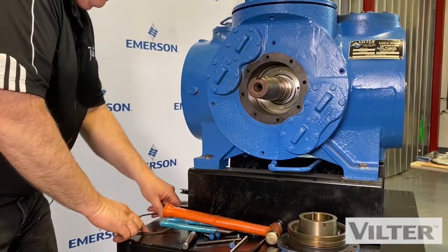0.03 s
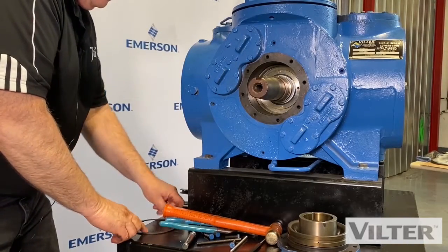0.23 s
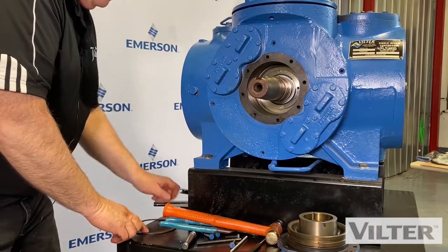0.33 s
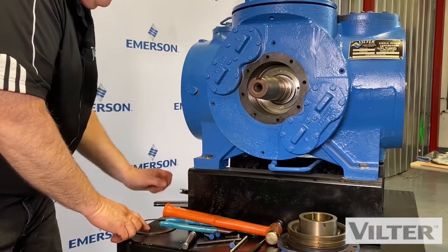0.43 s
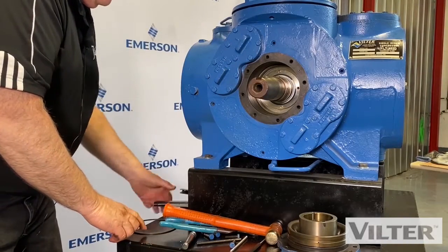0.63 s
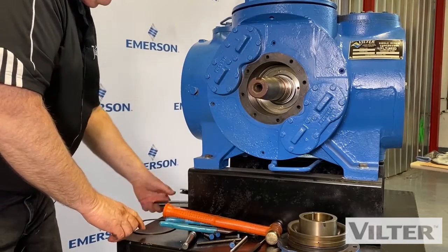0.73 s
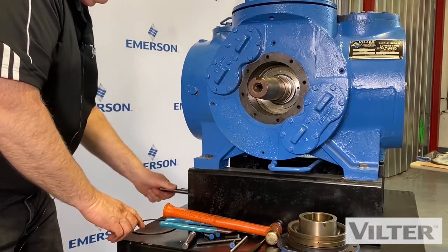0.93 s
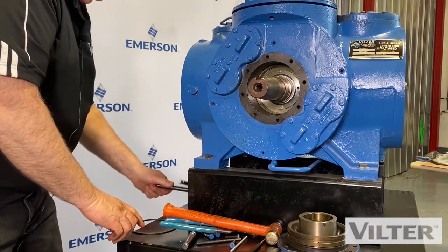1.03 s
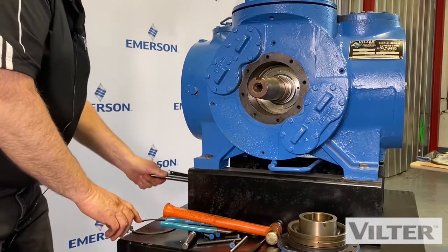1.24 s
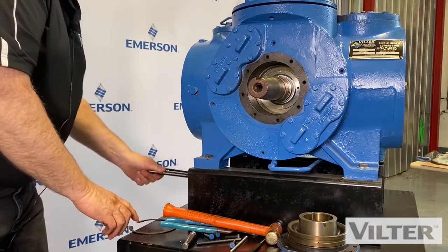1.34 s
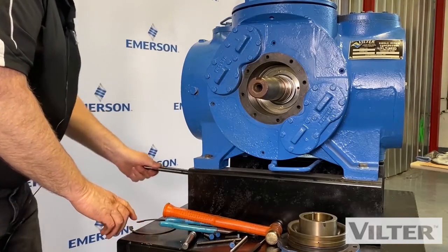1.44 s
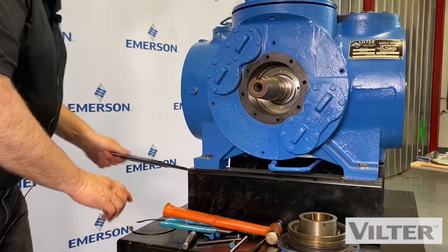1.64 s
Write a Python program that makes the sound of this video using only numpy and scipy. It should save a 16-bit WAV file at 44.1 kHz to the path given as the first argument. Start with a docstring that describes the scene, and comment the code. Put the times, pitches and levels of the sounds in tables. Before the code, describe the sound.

A steel tool clanks onto a metal table, then a rod rattles and slides away.

```python
"""A large workshop, at a metal table. A steel tool drops among others: one bright clank and a bounce.
A steel rod then slides out, clinks on a neighbour, knocks and rattles on the table and is drawn away.
The hits layer dying sines for the ring of the metal with fast-fading noise for its crash; the slides
are grainy noise. The hall rings after each blow, over a low bed of ventilation rumble."""
import sys
import numpy as np
from scipy import signal
from scipy.fft import rfft, irfft
from scipy.io import wavfile
from scipy.ndimage import uniform_filter1d

SR = 44100
rng = np.random.default_rng(int(sys.argv[2]) if len(sys.argv) > 2 else 0)


def to_wav(sig):
    """Store sig (one row per channel, or 1-D mono) as 16-bit WAV at the path in sys.argv[1].

    Samples outside -1..1 are clipped; the rate is SR.
    """
    pcm = np.clip(np.atleast_2d(sig), -1, 1) * 32767
    pcm = np.round(pcm).astype(np.int16)
    wavfile.write(sys.argv[1], SR, pcm.T)  # frames by channels


N = 74970
T = np.arange(N) / SR
HZ = np.fft.rfftfreq(N, 1 / SR)

# The tool lands and bounces. Each row: start in seconds, level in dB, tilt in dB per octave.
LANDINGS = [(0.2192, -21.5, 1.5), (.2212, -13, -0.5), (0.2423, -20.5, 0), (.2446, -26.5, -.5),
            (0.2518, -23.5, 0)]
# The tool's ring. Each row: pitch in Hz, relative level in dB, time to fade by 60 dB (t60) in seconds.
TOOL_MODES = [(363, -20, .4), (548, -20, .12), (636, -12, .11), (702, -15, .09), (797, -21, .5),
              (1312, -15, .12), (1525, -21, .17), (1620, -22, .33), (1748, -12, .12), (1815, -15, .09),
              (1895, -28, .55), (2150, -19, .07), (2405, -21, .09), (3270, -15, .035), (3407, -16, .045),
              (4790, -18, .06), (6545, -10, .05), (8040, -14, .045)]
# The clatter of the pile under it. Each row: frequency in Hz, relative level in dB.
CLATTER_COLOUR = [(130, -50.5), (200, -11.5), (450, -10), (680, -5.5), (980, -8.5), (1300, 2), (1750, 1),
                  (2100, -4.5), (2800, -7), (3600, -2.5), (7500, -4), (10200, -10), (13300, -8),
                  (15500, -27.5)]
# The clatter's decay. Each row: frequency in Hz, t60 in seconds.
CLATTER_DECAY = [(250, 0.2), (1500, 0.056), (5000, 0.032), (13000, .036)]
# The table's boom under the landing. Each row: pitch in Hz, level in dB, t60 in seconds.
BOOM_MODES = [(196, -55.5, .7), (248.6, -49.5, 0.86), (289.2, -68.5, 0.4)]

# The rod hits the table. Each row: start in seconds, table level in dB, table tilt in dB per octave,
# rod level in dB, rod tilt in dB per octave.
ROD_KNOCKS = [(0.624, -60.5, -4, -73.5, 8), (0.9012, -36.5, 0, -64, 9), (.9075, -40.5, 2.5, -55, 11),
              (.9155, -42.5, 4.5, -66, 10), (.9315, -49, -10, -76, 0), (.9772, -30, 5, -27, -2),
              (0.9803, -25, 1, -60, 3), (1.0065, -33, 3.5, -79, -3), (1.104, -40.5, 0, -72, 3),
              (1.1495, -39.5, 1.5, -54, -5), (1.1615, -38, 1, -63, 17), (1.1805, -50, 6, -56.5, 6),
              (1.2096, -35.5, 1, -51.5, -6.5), (1.2185, -33, -0.5, -59, 4), (1.2315, -37.5, 3, -65, 5),
              (1.2405, -36, 1.5, -49, -2), (1.256, -56.5, -12, -68, 6)]
# The table top's ring. Each row: pitch in Hz, relative level in dB, t60 in seconds.
TABLE_MODES = [(201, -17, .45), (255, -13, .7), (357, -15, .4), (434, -7, .13), (474, -8, .14),
               (530, -15, .2), (585, -16, .25), (686, -12, .2), (888, -9, .16), (1016, -6, .15),
               (1040, -7, .2), (1158, -12, .18), (1320, -18, .25), (1618, -18, .18), (1890, -22, .22),
               (2170, -19, .14)]
# The table's thud. Each row: frequency in Hz, relative level in dB.
THUD_COLOUR = [(130, -71), (195, -4.5), (260, -1.5), (305, -12), (380, 1), (720, 3.5), (820, -18),
               (1050, 3), (1380, 3.5), (1490, -2), (1600, 2), (2150, -4), (2700, -13), (5000, -22),
               (9000, -31.5), (15000, -49)]
# The thud's decay. Each row: frequency in Hz, t60 in seconds.
THUD_DECAY = [(250, 0.58), (1200, 0.1), (4000, 0.11), (12000, 0.068)]
# The rod's thin ring. Each row: pitch in Hz, relative level in dB, t60 in seconds.
ROD_MODES = [(2700, -13, .06), (3650, -8, .06), (4942, -14, .05), (6503, -3, .055), (7004, -8, .05),
             (7849, -1, .05), (8495, -7, .11), (9600, -9, .06), (11250, -11, .045), (12180, -21, .09),
             (13080, -6, .055), (14900, -19, .05)]
# The clink of its small neighbour. Each row: pitch in Hz, relative level in dB, t60 in seconds.
SMALL_TOOL_MODES = [(2350, -14, .05), (5980, -13, .04), (8120, -1, .045), (9920, -1, .035),
                    (11080, -1, .03), (11260, -3, .04), (13280, -6, .03)]
# The tick of steel on steel. Each row: frequency in Hz, relative level in dB.
TICK_COLOUR = [(800, -8), (2800, -1.5), (7500, -1), (10500, -6.5), (13000, -8), (15500, -29)]

# Steel slides over the table. Each row: start, length, attack and release in seconds, level in dB,
# tilt in dB per octave, resonance in Hz, its relative level in dB.
STROKES = [(0.631, 0.354, .11, 0.015, -57, -0.7, 1760, -12.5),
           (0.96, 0.23, 0.021, 0.12, -46.5, -1, 3500, -19),
           (1.413, .125, 0.017, 0.071, -57, -0.43, 2870, -8),
           (1.522, .26, 0.1, .05, -55.5, 1.94, 4440, -18)]
# The scrape's tone. Each row: frequency in Hz, relative level in dB.
SCRAPE_COLOUR = [(150, -5), (400, 9.5), (750, 8), (1050, -2.5), (1400, 5), (2200, -6.5), (3000, -10.5),
                 (4700, -8), (9000, -13.5), (13000, -16), (15500, -28)]

# The hall's tone. Each row: frequency in Hz, relative level in dB.
TAIL_COLOUR = [(150, 4), (850, -1.5), (1500, -1), (2700, -0.5), (4000, 0), (8000, -4), (14000, -2)]
# The hall's decay. Each row: frequency in Hz, t60 in seconds.
TAIL_DECAY = [(200, 0.62), (800, 0.69), (2000, 0.7349), (4000, 0.74), (8000, 0.5446), (14000, 0.35)]
# The ventilation bed. Each row: frequency in Hz, relative level in dB.
RUMBLE_COLOUR = [(15, 1.5), (36, 2), (60, -8), (150, -9.5), (450, -16.5), (1000, -20.5), (2000, -32),
                 (4000, -41.5), (13000, -45), (16000, -58.5)]


def dropped_tool(ring_db=-2):
    """Each landing rings the tool and rattles the pile under it; the table booms on the first."""
    out = np.zeros(N)
    for start, db, tilt in LANDINGS:
        clank = wash(CLATTER_COLOUR, CLATTER_DECAY) + amp(ring_db) * ring(TOOL_MODES)
        add(out, start, amp(db) * attack(tilted(clank, tilt)))
    add(out, LANDINGS[0][0], attack(ring(BOOM_MODES)))
    return out


def table_knocks():
    """Each knock of the rod draws a thud and a ring from the table top."""
    out = np.zeros(N)
    for start, db, tilt, _, _ in ROD_KNOCKS:
        knock = wash(THUD_COLOUR, THUD_DECAY) + ring(TABLE_MODES)
        add(out, start, amp(db) * attack(tilted(knock, tilt)))
    return out


def steel_rings(clink_s=0.9308, clink_db=-34.5):
    """The hand-held rod rings briefly at each knock; once it clinks on a small tool."""
    out = np.zeros(N)
    for start, _, _, db, tilt in ROD_KNOCKS:
        ping = tilted(ring(ROD_MODES), tilt, pivot_hz=7500) + tick(db=-5)
        add(out, start, amp(db) * ping)
    clink = ring(SMALL_TOOL_MODES) + tick(db=-7)
    add(out, clink_s, amp(clink_db) * clink)
    return out


def tick(db, t60=0.1):
    """The short, bright crack of steel meeting steel."""
    burst = noise(TICK_COLOUR) * amp(-60 * T / t60)
    return amp(db) * burst[:SR // 2]


def slides(grain_db=1, width_hz=630, table_db=-9):
    """Gritty friction swells with each stroke, sings in one broad resonance and rings the table."""
    out = np.zeros(N)
    for start, length, rise, release, db, tilt, sing_hz, sing_db in STROKES:
        fade_in = np.clip((T - start) / rise, 0, 1)
        fade_out = np.clip((start + length - T) / release, 0, 1)
        grain = unit(uniform_filter1d(rng.standard_normal(N), size=90))  # 2 ms flutter
        rub = unit(amp(grain_db * grain) * tilted(noise(SCRAPE_COLOUR), tilt))
        resonance = 1 / (1 + (2 * (HZ - sing_hz) / width_hz) ** 2)
        sing = unit(irfft(rfft(rub) * resonance, N))
        out += amp(db) * fade_in * fade_out * (rub + amp(sing_db) * sing)
    table = unit(signal.fftconvolve(out, ring(TABLE_MODES))[:N])
    return out + amp(table_db) * np.std(out) * table


def hall(send, db=-11.5, build_s=0.005, turn_s=0.07):
    """The workshop's diffuse tail: three sets of paths take turns carrying the sound."""
    out = np.zeros(N)
    for k in range(3):
        tail = attack(wash(TAIL_COLOUR, TAIL_DECAY, length_s=1), build_s)
        share = np.sqrt(2 / 3) * abs(np.cos(np.pi * (T / turn_s + k / 3)))  # equal-power crossfade
        out += signal.fftconvolve(send * share, tail / np.linalg.norm(tail))[:N]
    return amp(db) * out


def ventilation(rumble_db=-57, hum_hz=232.7, hum_db=-67):
    """A steady low rumble of air with a faint hum."""
    hum = np.sqrt(2) * np.sin(2 * np.pi * hum_hz * T)
    return amp(rumble_db) * noise(RUMBLE_COLOUR) + amp(hum_db) * hum


def ring(modes):
    """Struck metal: dying sines whose strengths vary a little with the point of impact."""
    t = T[:SR // 2]
    out = np.zeros(len(t))
    for k, (hz, db, t60) in enumerate(modes):
        envelope = amp(db + rng.normal(0, 1.5) - 60 * t / t60)
        out += (-1) ** k * envelope * np.sin(2 * np.pi * hz * t)
    return out


def wash(colour, decay, length_s=0.5):
    """Countless close modes: noise that dies at its own speed in each band."""
    size = int(length_s * SR)
    hz, t, bands = signal.stft(noise(colour)[:size], SR, nperseg=256)
    fade = amp(-60 * t / curve(decay, hz)[:, None])
    return signal.istft(bands * fade, SR)[1][:size]


def attack(x, rise_s=0.00082):
    """A quick fade-in: a blow builds while the contact lasts."""
    return x * np.minimum(T[:len(x)] / rise_s, 1)


def tilted(x, db_per_octave, pivot_hz=1000):
    """Tilt EQ: brightens or dulls a sound about a pivot."""
    octaves = np.log2(np.clip(HZ, 250, 16000) / pivot_hz)
    return irfft(rfft(x, N) * amp(db_per_octave * octaves), N)[:len(x)]


def noise(colour):
    """Coloured noise at rms 1."""
    phases = np.exp(2j * np.pi * rng.random(len(HZ)))
    return unit(irfft(amp(curve(colour, HZ)) * phases, N))


def curve(points, hz):
    """Reads a table on a log-frequency axis."""
    point_hz, values = np.transpose(points)
    return np.interp(np.log(hz + 1), np.log(point_hz + 1), values)


def amp(db):
    """Decibels to gain."""
    return 10 ** (np.asarray(db) / 20)


def unit(x):
    """Scales to rms 1."""
    return x / np.sqrt(np.mean(x ** 2) + 1e-20)


def add(mix, start_s, sound):
    """Lays a sound into the mix at its cue."""
    part = mix[round(start_s * SR):][:len(sound)]
    part += sound[:len(part)]


def scene(low_cut_hz=147, steel_send_db=-3.5):
    """The mono mix: tools and table up front, hall and ventilation behind."""
    low_cut = signal.butter(4, low_cut_hz, "high", fs=SR, output="sos")  # the table radiates little bass
    body = signal.sosfilt(low_cut, dropped_tool() + table_knocks() + slides())
    steel = steel_rings()
    send = body + amp(steel_send_db) * steel  # thin rings reach the hall less than the table does
    return (body + steel + hall(send) + ventilation())[None]


def record(dry, high_cut_hz=15500):
    """A steep high cut trims the very top."""
    high_cut = signal.firwin(255, high_cut_hz, window=("kaiser", 9), fs=SR)
    return signal.oaconvolve(dry, high_cut[None], "same")


dry = scene()
out = record(dry)
to_wav(out)
```